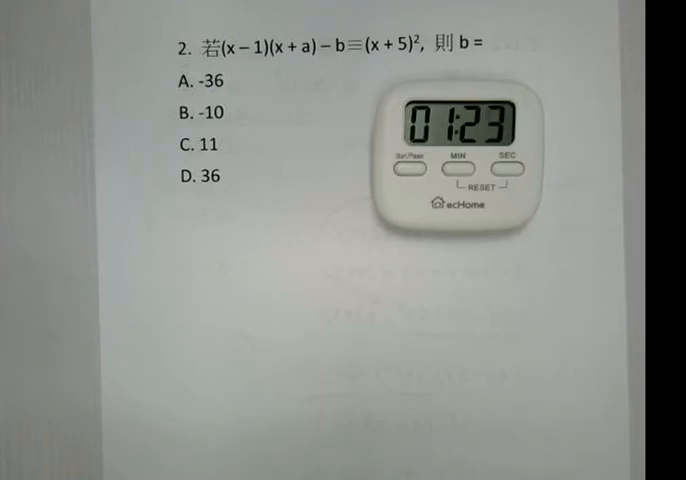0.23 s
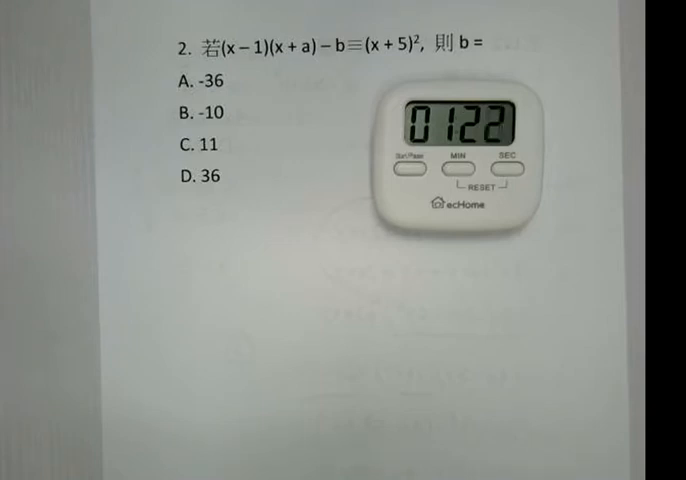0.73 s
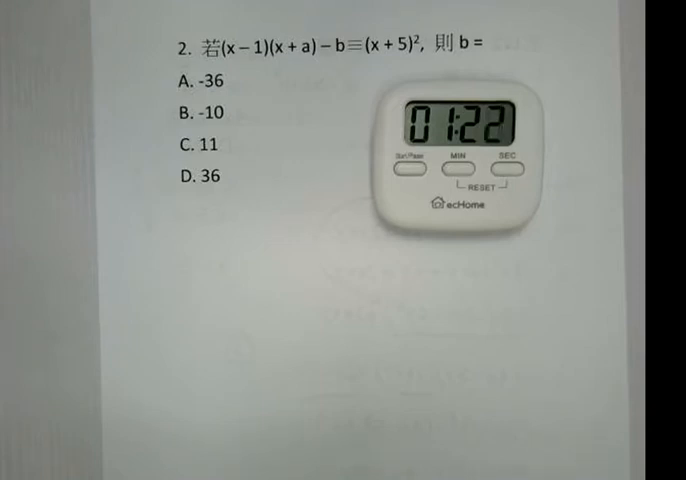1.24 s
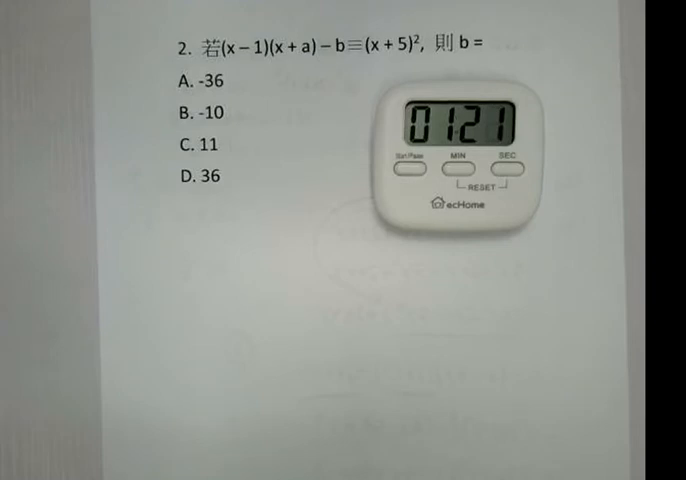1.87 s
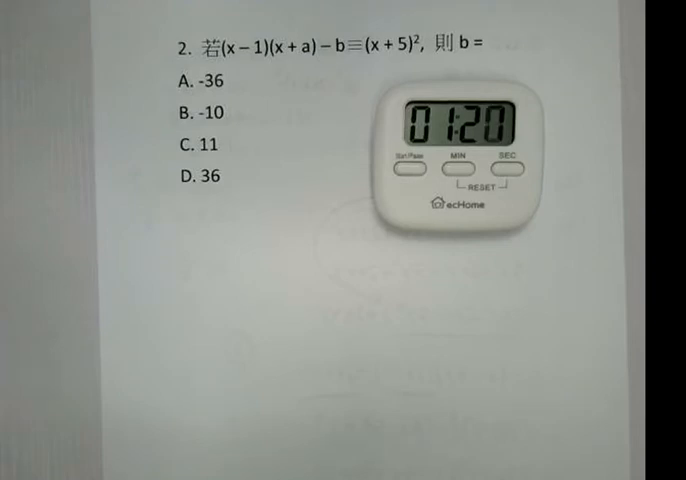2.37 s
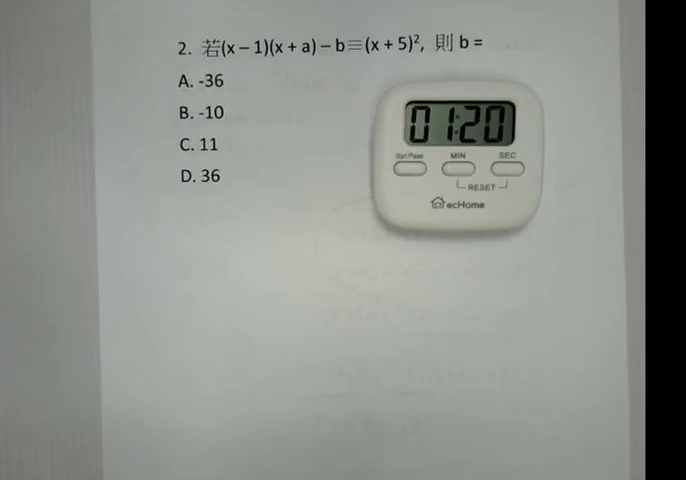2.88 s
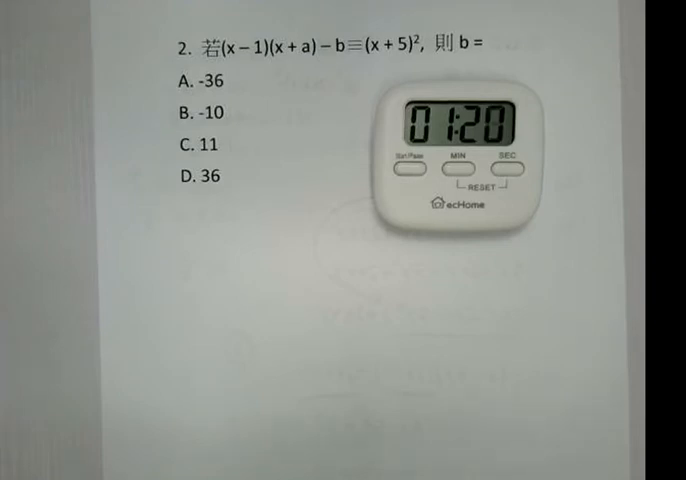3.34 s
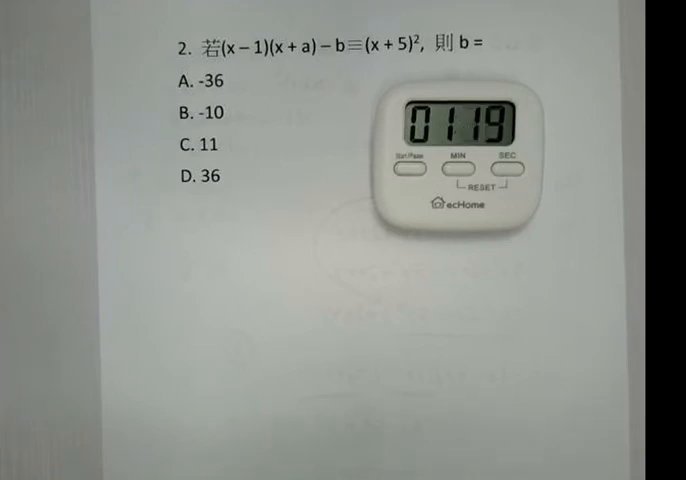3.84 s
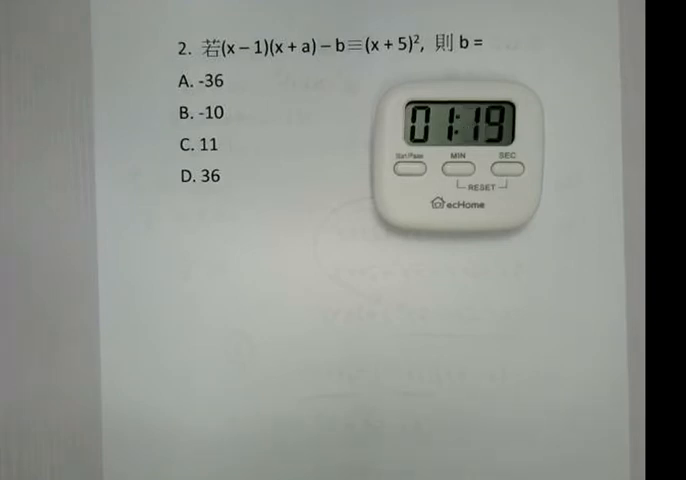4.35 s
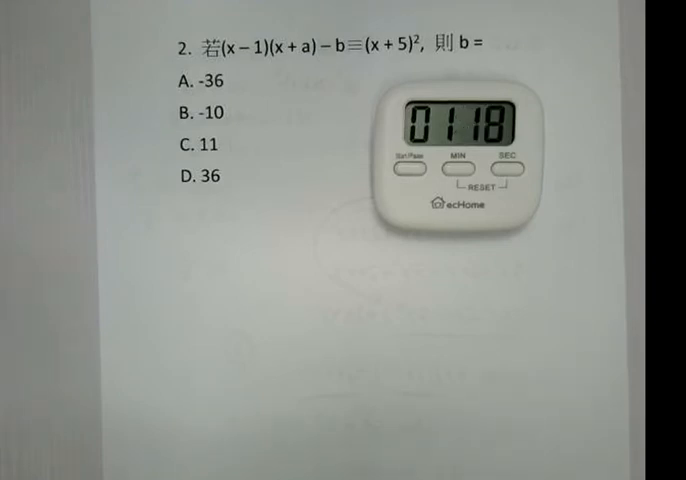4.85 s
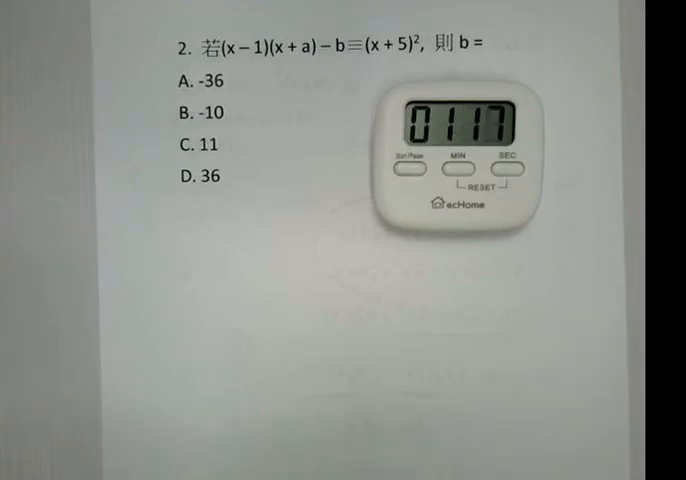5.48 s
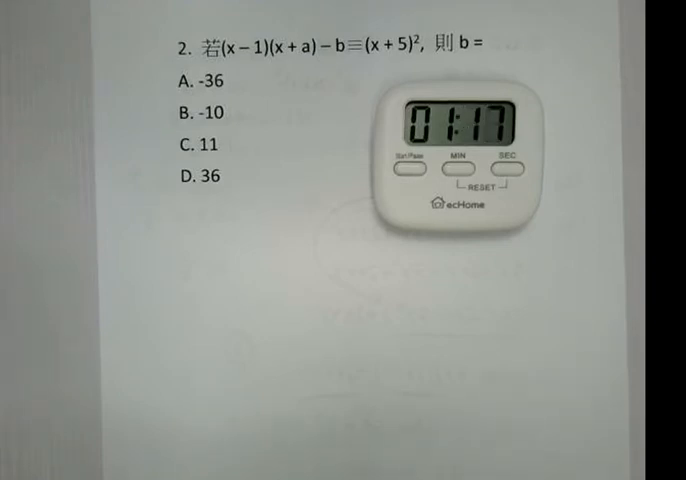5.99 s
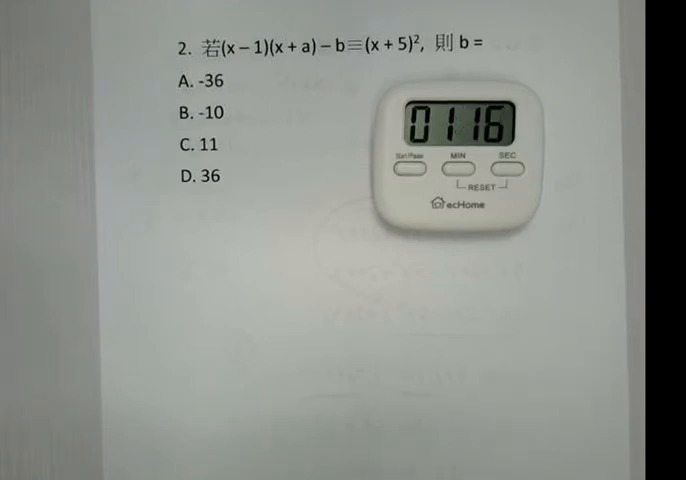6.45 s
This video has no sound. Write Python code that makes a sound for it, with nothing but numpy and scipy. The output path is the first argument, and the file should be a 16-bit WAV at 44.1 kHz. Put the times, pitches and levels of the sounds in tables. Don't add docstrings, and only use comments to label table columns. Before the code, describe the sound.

Quiet room tone of electrical hum, airy rumble and faint hiss; a brief cluster of desk taps and a creak, then tiny ticks.

```python
import sys
import numpy as np
from scipy import signal
from scipy.fft import rfft, irfft, next_fast_len
from scipy.io import wavfile

SR = 44100
rng = np.random.default_rng(int(sys.argv[2]) if len(sys.argv) > 2 else 0)


def invert_db(level):
    return 10 ** (np.asarray(level, dtype=float) / 20)


def unload_wav(signal):
    wavfile.write(
        sys.argv[1],
        SR,
        np.round(np.clip(np.atleast_2d(signal).T, -1, 1) * 32767).astype(np.int16),
    )


N = 296352


def read_curve(points, hz):
    point_hz, point_db = np.transpose(points)
    return np.interp(np.log(hz + 1), np.log(point_hz + 1), point_db)


def add(mix, start_s, sound):
    part = mix[round(start_s * SR):][:len(sound)]
    part += sound[:len(part)]


def noise(density):
    size = next_fast_len(N)
    hz = np.fft.rfftfreq(size, 1 / SR)
    spectrum = rfft(rng.standard_normal(size))
    return irfft(spectrum * density(hz) * np.sqrt(SR / 2), size)[:N]


def repeat(multiples, hz, start):
    cycle = irfft(multiples, 2 ** 14) * 2 ** 13
    place = (np.arange(N) * hz / SR + start) % 1
    return np.interp(place, np.linspace(0, 1, len(cycle) + 1), np.append(cycle, cycle[0]))


def mains():
    mains_hz, start_cycles, switch_edge_hz = 49.9645, -.609, 4000
    # multiple of the mains pitch, level in dB, polarity (1 or -1).
    hum = [(1, -37.6, 1), (2, -37.3, 1), (3, -74.6, -1), (4, -48.6, -1), (5, -70.0, -1), (6, -59.6, 1),
           (7, -76.4, 1), (8, -64.9, 1), (9, -75.3, 1), (10, -71.5, 1), (11, -77.3, 1), (12, -79.5, 1),
           (13, -66.1, 1), (14, -61.9, 1), (15, -78.9, 1), (16, -67.1, -1), (17, -71.3, -1),
           (18, -75.5, -1), (19, -77.8, 1), (20, -67.6, 1), (21, -83.8, 1), (22, -74.9, -1), (23, -76.7, 1),
           (24, -72.6, 1), (25, -79.9, 1), (26, -79.7, 1), (27, -81.6, 1), (28, -95.5, 1), (29, -80.0, 1),
           (30, -86.5, 1)]
    switch_at = [.1544, .208, .6573, .7048]
    switch_db = [-46.5, -43.5, -48, -42.5]
    k = np.arange(1, 301)
    steps = sum(invert_db(db) * np.exp(-2j * np.pi * k * at) for at, db in zip(switch_at, switch_db))
    softening = 1 + 1j * k * mains_hz / switch_edge_hz
    multiples = steps / (1j * np.pi * k) / softening
    _, db, polarity = np.transpose(hum)
    multiples[:len(hum)] = -1j * np.sqrt(2) * invert_db(db) * np.sign(polarity)
    return repeat(np.append(0, multiples), mains_hz, start_cycles)


def tick(db, low_hz, high_hz, high_db, t60, crack_db):
    crack_t60, rise_s = .005, .0006
    damping_power = 1.6
    t = np.arange(round(.1 * SR)) / SR
    ring = np.sin(2 * np.pi * low_hz * t) + invert_db(high_db) * np.sin(2 * np.pi * high_hz * t)
    ring *= invert_db(-60 * (t / t60) ** damping_power) * (1 - np.exp(-t / rise_s)) ** 2
    band = signal.butter(2, [2700, 6000], "band", fs=SR, output="sos")
    jolt = 3 * (t == 0)
    crack = signal.sosfilt(band, rng.standard_normal(len(t)) + jolt)
    crack *= invert_db(crack_db - 60 * t / crack_t60)
    return invert_db(db) * (ring + crack)


def taps():
    # start in seconds, peak in dB, mode pitch in Hz, ring time in seconds.
    tap_table = [
        (3.9645, -50.5, 1880, 0.029),
        (4.5800, -45, 1860, .011),
        (4.5840, -53, 1900, .035),
        (4.6986, -33, 1536, 0.017),
        (4.7415, -48, 1640, .011),
    ]
    out = np.zeros(N)
    for start_s, db, hz, t60 in tap_table:
        add(out, start_s, tick(db, hz, hz * 2.28, high_db=-23, t60=t60, crack_db=-11))
    return out


def tinks():
    # start in seconds, peak in dB, low mode in Hz, high mode in Hz.
    tink_table = [
        (4.6478, -60, 4500, 4850),
        (4.85, -59, 4900, 5200),
        (6.5042, -58, 5000, 5880),
        (6.5115, -56, 4800, 5750),
    ]
    out = np.zeros(N)
    for start_s, db, low_hz, high_hz in tink_table:
        add(out, start_s, tick(db, low_hz, high_hz, high_db=0, t60=.011, crack_db=0))
    return out


def creak():
    low_hz, rise_hz_per_s, high_hz = 2417, 11000, 4964
    rebound_delay_s, rebound_t60 = .0052, .012
    # start in seconds, peak in dB, high mode in dB against the low one,
    # rebound in dB against the slip, ring time in seconds.
    slips = [
        (4.7641, -45, -2, 1, 0.017),
        (4.777, -41.5, 3, -2, 0.0079),
        (4.7910, -30.5, -10, -14.5, 0.0068),
    ]
    out = np.zeros(N)
    for start_s, db, high_db, rebound_db, t60 in slips:
        slip_hz = low_hz + rise_hz_per_s * (start_s - slips[0][0])
        add(out, start_s, tick(db, slip_hz, high_hz, high_db, t60, 1 + .72 * high_db))
        add(out, start_s, tick(db - 22.5 + 2 * high_db, 7700, 8500, high_db=0, t60=.012, crack_db=0))
        rebound_hz = slip_hz + rise_hz_per_s * rebound_delay_s
        dull_db = high_db - 6
        rebound = tick(db + rebound_db, rebound_hz, high_hz, dull_db, rebound_t60, -9 + .6 * dull_db)
        add(out, start_s + rebound_delay_s, rebound)
    return out


def squeak():
    start_s, length_s, level_db, fade_s = 1.885, .085, -74.5, .012
    top_hz, top_s, bend_hz_per_s2 = 13050, .07, 140000
    t = np.arange(0, length_s, 1 / SR)
    hz = top_hz - bend_hz_per_s2 * (t - top_s) ** 2
    fade = np.clip(np.minimum(t, length_s - t) / fade_s, 0, 1)
    whistle = np.sin(2 * np.pi * np.cumsum(hz) / SR)
    out = np.zeros(N)
    add(out, start_s, np.sqrt(2) * invert_db(level_db) * fade * whistle)
    return out


def fan():
    shaft_hz = 73.637
    # multiple of the shaft pitch, level in dB.
    shaft_tones = [(7, -81), (10, -86), (11, -87), (14, -89), (15, -86), (16, -88), (20, -78), (21, -90),
                   (22, -86), (24, -94), (25, -91), (27, -88), (28, -94), (29, -91), (34, -94)]
    multiples = np.zeros(64, complex)
    for k, db in shaft_tones:
        phase = np.exp(2j * np.pi * rng.random())
        multiples[round(k)] = np.sqrt(2) * invert_db(db) * phase
    return repeat(multiples, shaft_hz, 0)


def rumble():
    # pitch in Hz, level in dB per Hz.
    air = [(10, -83), (32, -76.5), (50, -77), (70, -83), (120, -78), (220, -75), (310, -79), (480, -85),
           (700, -87), (900, -88), (1300, -95), (2300, -102), (3500, -108), (7000, -118)]
    # pitch in Hz, width in Hz, level in dB.
    room = [(22.5, 3, -58), (127, 8, -66), (178, 20, -62), (195.5, 11, -55), (242, 18, -52.5),
            (268, 11, -56), (290, 24, -62), (352, 16, -64), (400, 14, -68), (435, 30, -68), (515, 20, -70),
            (620, 60, -68), (790, 40, -70), (885, 50, -68)]

    def density(hz):
        power = invert_db(read_curve(air, hz)) ** 2
        for mode_hz, width, db in room:
            power = power + invert_db(db) ** 2 / width / (1 + (2 * (hz - mode_hz) / width) ** 2) ** 2
        return np.sqrt(power)

    return noise(density)


def preamp_hiss():
    # pitch in Hz, level in dB per Hz.
    hiss_curve = [(300, -104), (3000, -106), (8000, -107), (16000, -107)]
    return noise(lambda hz: invert_db(read_curve(hiss_curve, hz)))


def scene():
    desk = taps() + tinks() + creak() + squeak()
    background = fan() + rumble() + preamp_hiss()
    return (mains() + desk + background)[None]


def roll_off(x):
    return signal.sosfilt(signal.butter(12, 15500, fs=SR, output="sos"), x)


def record(dry):
    return roll_off(dry)


dry = scene()
out = record(dry)
unload_wav(out)
```